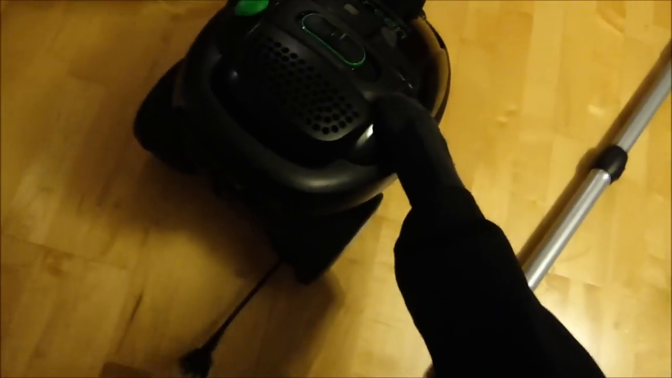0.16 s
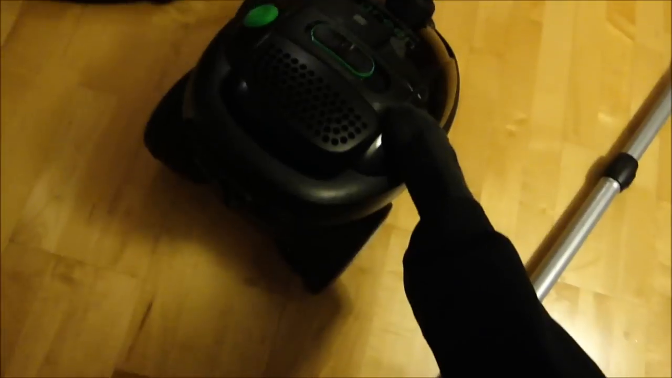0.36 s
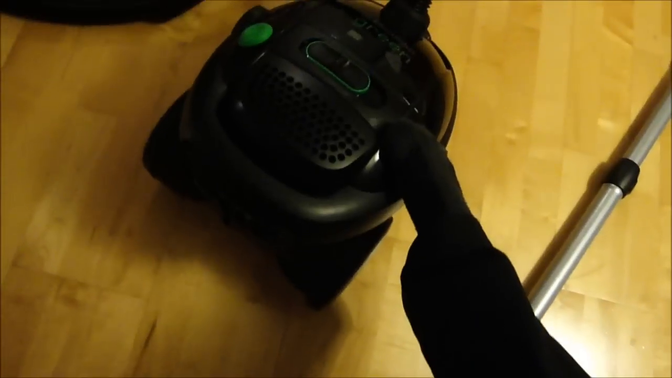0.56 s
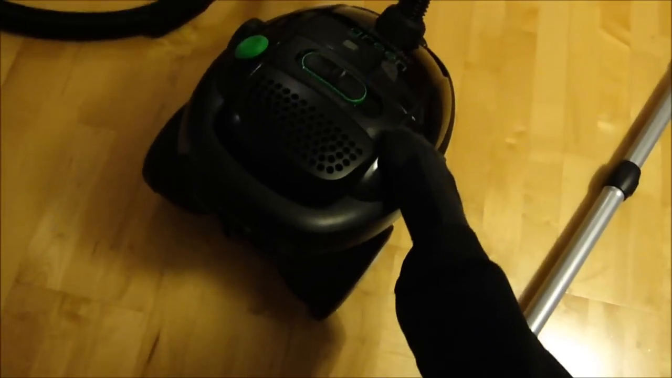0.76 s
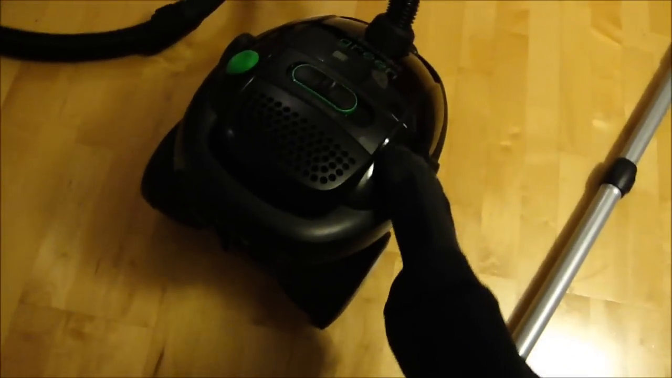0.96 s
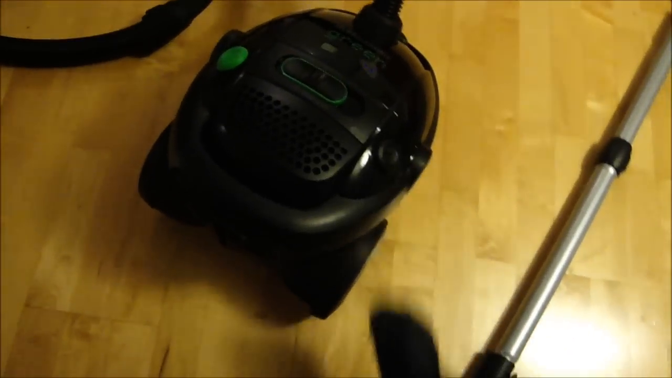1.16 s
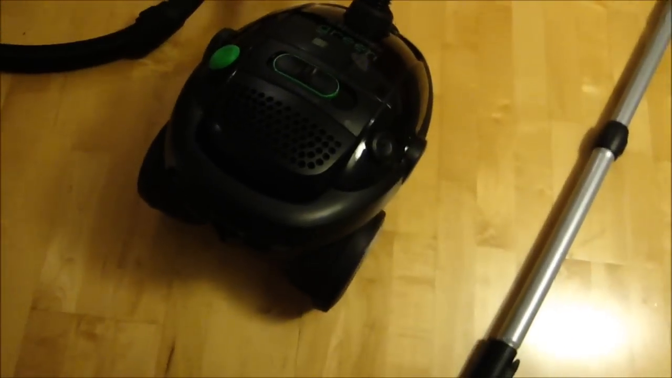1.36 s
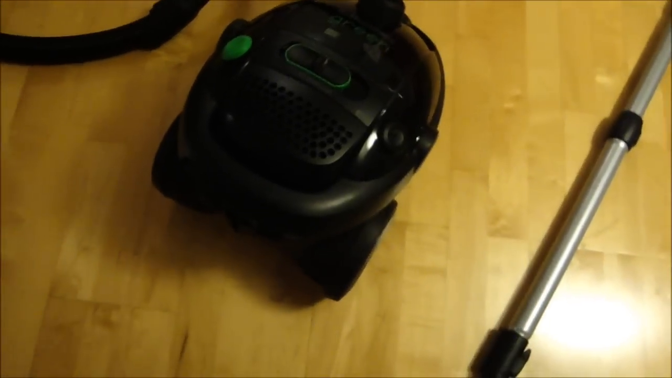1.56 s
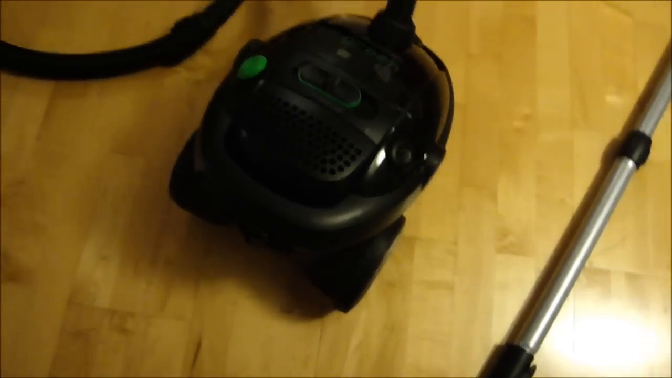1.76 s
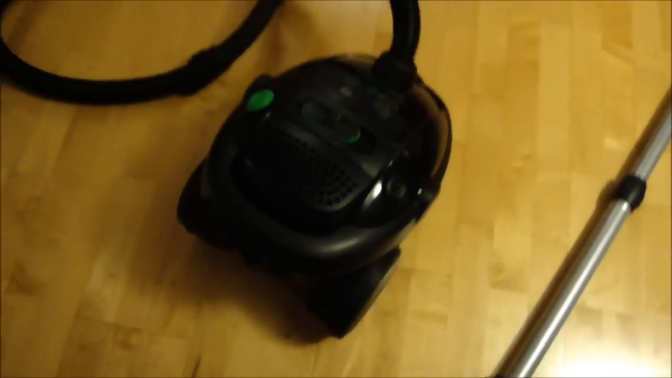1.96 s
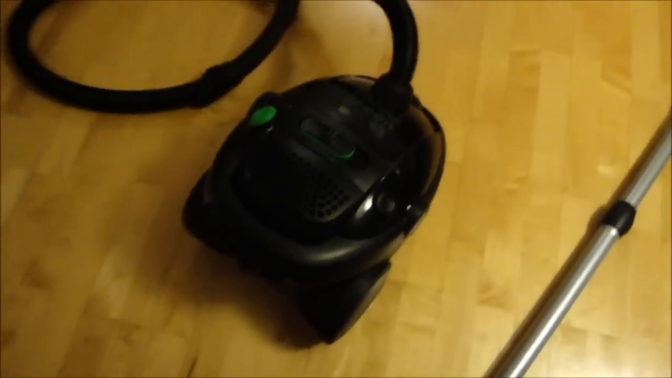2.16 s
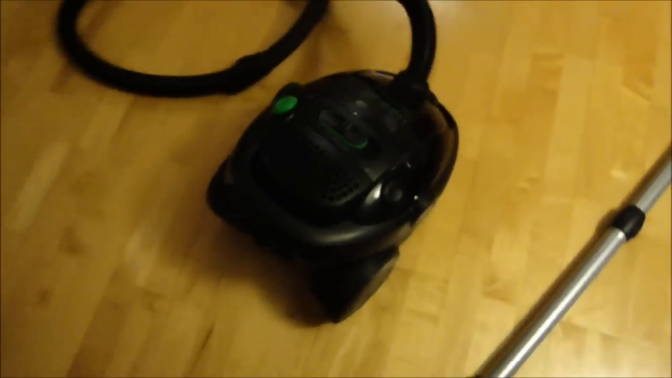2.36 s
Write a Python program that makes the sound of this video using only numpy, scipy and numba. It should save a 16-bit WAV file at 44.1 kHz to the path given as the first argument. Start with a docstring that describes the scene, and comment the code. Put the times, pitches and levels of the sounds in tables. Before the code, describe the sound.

Vacuum cord rewind ends in a loud plastic slam and rattle, then a quiet pedal release

```python
"""A vacuum cleaner's cord whirrs and briefly squeals onto its reel, then the plug slams into the plastic housing
and bounces: slips and blows ring damped housing modes, and a bare hard-floored room answers with filtered noise.
The foot leaves the pedal among thin dry ticks; a camera's focus motor ticks and the hand creaks on its body, all
as short damped modes. Shaped noise hisses beneath. A peak limiter turns down the loudest blows."""
import sys
import numpy as np
from scipy import signal
from scipy.fft import rfft, irfft
from scipy.io import wavfile
from scipy.ndimage import uniform_filter1d
from numba import njit

SR = 44100
rng = np.random.default_rng(int(sys.argv[2]) if len(sys.argv) > 2 else 0)


def field_ratio(decibels):
    """Amplitude ratio for a level in dB (20 dB per decade); scalars and array-likes work."""
    return 10 ** (np.asarray(decibels, dtype=float) / 20)


def generate_wav(signal):
    """Clip the signal to [-1, 1] and save it as 16-bit WAV at the path in sys.argv[1]."""
    frames = np.transpose(np.atleast_2d(signal))
    scaled = np.clip(frames, -1, 1) * 32767
    pcm = np.round(scaled).astype(np.int16)
    wavfile.write(sys.argv[1], SR, pcm)


N = 110250  # samples
GRAIN = 4096  # samples in one ring or crack
CRACK_T60_S = 0.0098

# plastic housing modes: pitch_hz, level_db, t60_s
HOUSING_MODES = [(340, -11, 0.022), (555, -19, 0.067), (646, 9, 0.019), (806, 1.5, 0.024), (993, 1, 0.029),
                 (1116, 6.5, 0.02), (1522, 4.5, 0.019), (1910, 5.5, 0.01), (1990, -9, 0.0065),
                 (2770, 4.5, 0.0041), (3150, -12.5, .01), (4100, -12, 0.0058), (4770, -11, 0.02),
                 (6000, -33, 0.0027)]


def unit(x):
    """Scale to an rms of 1."""
    return x / np.sqrt(np.mean(x ** 2))


def band(x, hz, width_hz):
    """Band-pass around hz."""
    edges_hz = [max(hz - width_hz / 2, 10), min(hz + width_hz / 2, 20000)]
    return signal.sosfilt(signal.butter(1, edges_hz, "band", fs=SR, output="sos"), x)


def cut_bass(x, hz):
    """High-pass: small bodies radiate little bass."""
    return signal.sosfilt(signal.butter(2, hz, "high", fs=SR, output="sos"), x)


def add(out, start_s, x):
    """Mix x into out from start_s."""
    i = int(start_s * SR)
    out[i:i + len(x)] += x[:N - i]


def fade(t60_s, size=GRAIN):
    """Exponential decay, 60 dB in t60_s."""
    return np.exp(-np.log(1000) * np.arange(size) / SR / t60_s)


def ring(hz, t60_s):
    """One damped mode."""
    return np.sin(2 * np.pi * hz * np.arange(GRAIN) / SR) * fade(t60_s)


def crack(t60_s):
    """Sharp spike trailed by a short noise burst, dull at both edges of the spectrum."""
    burst = rng.standard_normal(GRAIN) * fade(t60_s)
    burst[0] = 2.26
    burst = uniform_filter1d(burst, size=3, origin=1)
    return signal.sosfilt(signal.butter(1, [900, 3240], "band", fs=SR, output="sos"), burst) * 2


def patchy():
    """Quick random wandering of level."""
    spread_db, window = 2.5, int(0.012 * SR)
    drift = uniform_filter1d(uniform_filter1d(rng.standard_normal(N), window), window)
    return field_ratio(spread_db * unit(drift))


def rub(curve, rasp_db):
    """Dense uneven slips ring the housing, damped by the contact, with a fine rasp on top."""
    slips_per_s, scatter_db, t60_factor = 1800, 3, 0.6
    t = np.arange(N) / SR
    time_s, level_db, brightness = np.array(curve).T
    hits = rng.random(N) < slips_per_s / SR
    sizes = field_ratio(scatter_db * rng.standard_normal(N))
    slips = unit(hits * sizes * rng.choice([-1, 1], N))
    tilt_db_per_oct = np.clip(np.interp(t, time_s, brightness), -6, 5)
    body, power = 0, 0
    for hz, mode_db, t60_s in HOUSING_MODES:
        gain = field_ratio(mode_db + tilt_db_per_oct * np.log2(hz / 1000))
        mode = ring(hz, t60_factor * t60_s)
        body = body + gain * patchy() * signal.fftconvolve(slips, mode)[:N]
        power = power + gain ** 2 * np.sum(mode ** 2)
    rasp = unit(band(slips + rng.standard_normal(N), 4600, 7600))
    on = (t >= time_s[0]) & (t < time_s[-1])
    return (body / np.sqrt(power) + field_ratio(rasp_db) * rasp) * field_ratio(np.interp(t, time_s, level_db)) * on


def squeal():
    """The cord catches: noise in a narrow band wavers as a tone that swells and fades."""
    # start_s, end_s, pitch_hz, width_hz, level_db
    squeals = [(.016, .036, 1850, 300, -43), (.052, .09, 1090, 130, -39)]
    out = np.zeros(N)
    for start_s, end_s, hz, width_hz, db in squeals:
        size = int((end_s - start_s) * SR)
        noise = rng.standard_normal(4 * size)
        tone = band(band(noise, hz, width_hz), hz, width_hz)[-size:]  # filters settled
        swell = np.sin(np.pi * np.linspace(0, 1, size) ** 0.86) ** 0.5
        add(out, start_s, field_ratio(db) * unit(tone) * swell)
    return out


def strike(blows, spread_oct, push_s):
    """Each blow rings the housing modes near its pitch and cracks briefly; a softer contact pushes longer."""
    out = np.zeros(N)
    rise = 1 - np.exp(-np.arange(GRAIN) / SR / push_s)
    for start_s, db, centre_hz, crack_db in blows:
        detune = 1 + 0.02 * rng.standard_normal(len(HOUSING_MODES))
        tone = 0
        for (hz, mode_db, t60_s), shift in zip(HOUSING_MODES, detune):
            nearness = np.exp(-0.5 * (np.log2(hz / centre_hz) / spread_oct) ** 2)
            tone = tone + field_ratio(mode_db) * nearness * ring(hz * shift, t60_s)
        tone = rise * tone
        blow = tone / np.abs(tone).max() + field_ratio(crack_db) * crack(CRACK_T60_S)
        add(out, start_s, field_ratio(db) * blow)
    return out


def cord_reel():
    """Cord runs through its guide, plug strikes the housing, reel and plug rattle on inside."""
    # cord in the guide: time_s, level_db, brightness_db_per_oct (rub clamps it)
    cord = [(0, -42.5, 8.5), (.02, -39.5, 13), (.05, -37, 20), (.075, -38, 11), (.088, -31, 11),
            (.095, -49, 5), (.105, -35.5, -3), (.13, -43.5, 2), (.16, -37.5, 10), (.18, -29.5, 15),
            (.19, -43, -38), (.206, -34, 10), (.209, -57, 5)]
    # rattle after the slam: time_s, level_db, brightness_db_per_oct (rub clamps it)
    rattle = [(.212, -38, 0), (.24, -25, 1), (.27, -23.5, -4.5), (.3, -22.5, -9), (.33, -23, -2.5),
              (.345, -29.5, -19), (.375, -29.5, -5), (.4, -22.5, -8), (.43, -30.5, -3), (.46, -55, 4)]
    # blows on the housing: start_s, ring_peak_db, most_rung_hz, crack_db (relative to the ring)
    blows = [(.101, -31, 5200, -10), (.105, -24, 700, -14), (.146, -20, 1200, -12), (.149, -20, 1900, -10),
             (.177, -26, 1300, -14), (.2084, 11, 620, -20), (.218, -12, 800, -8), (.322, -12, 1000, -8),
             (.3346, 5, 1150, -18), (.3368, 3, 1150, -16), (.339, -3, 1500, -14), (.342, -3, 800, -18),
             (.3527, -1, 1900, -9), (.355, 1, 1300, -9), (.3575, -1, 900, -14), (.3635, -14, 1500, -10)]
    friction = rub(cord, rasp_db=-12) + rub(rattle, rasp_db=-26) + squeal()
    return cut_bass(friction + strike(blows, spread_oct=0.63, push_s=0.0002), 467)


def pedal_release():
    """Pedal springs back with soft knocks while it slides under the sock."""
    # slide under the sock: time_s, level_db, brightness_db_per_oct (rub clamps it)
    slide = [(.92, -84, -4), (.95, -47, -13), (.975, -46.5, -9), (.99, -42.5, 16), (1.015, -41.5, -14.5),
             (1.045, -52, 2), (1.09, -57.5, 2), (1.12, -70, -9)]
    # pedal knocks: start_s, ring_peak_db, most_rung_hz, crack_db (relative to the ring)
    knocks = [(.977, -33, 640, -26), (.9875, -31, 650, -26), (.9915, -24, 650, -22),
              (1.0015, -32, 650, -26), (1.013, -35, 650, -26), (1.0345, -36, 700, -6),
              (1.038, -36, 700, -6)]
    return cut_bass(rub(slide, rasp_db=-6.5) + strike(knocks, spread_oct=0.266, push_s=0.0018), 300)


def hand_creak():
    """The hand shifts on the camera: single body modes, each with a faint crack."""
    # creaks: start_s, level_db, pitch_hz, t60_s
    creaks = [(2.4115, -26.5, 1020, 0.045), (2.4132, -26, 360, 0.046), (2.416, -22.5, 1330, 0.007),
              (2.418, -26.5, 557, .025), (2.417, -36, 5760, 0.0092), (2.4196, -27, 3000, 0.0042),
              (2.42, -26.5, 1950, 0.0041), (2.423, -25, 1090, 0.022), (2.425, -26.5, 560, 0.02),
              (2.431, -30.5, 363, 0.052)]
    out = np.zeros(N)
    for start_s, db, hz, t60_s in creaks:
        add(out, start_s, field_ratio(db) * (ring(hz, t60_s) + field_ratio(-8.5) * crack(2 * CRACK_T60_S)))
    return out


def thin_ticks():
    """Thin dry ticks, some from the pedal's release: two high, quickly damped modes each."""
    # ticks: start_s, level_db, pitch_hz
    ticks = [(0.88, -36.5, 7300), (1.006, -40, 7200), (1.035, -33.5, 7300), (1.034, -39, 4360),
             (1.04, -36, 6000), (1.99, -50, 6000), (2.078, -38, 6800), (2.189, -36.5, 6200),
             (2.485, -48, 5000)]
    out = np.zeros(N)
    for start_s, db, hz in ticks:
        add(out, start_s, field_ratio(db) * (ring(hz, 0.0031) + ring(1.16 * hz, 0.0024)))
    return out


def focus_motor():
    """Evenly timed motor steps, each ringing one high mode of slightly varying pitch and level."""
    # runs: first_step_s, end_s, level_db
    runs = [(0.602, .69, -49), (0.709, .81, -45), (1.0706, 1.095, -44), (1.1041, 1.21, -41.5),
            (1.672, 1.7, -46)]
    steps_per_s, pitch_hz, spread_hz, scatter_db = 59.94, 6160, 310, 2
    out = np.zeros(N)
    for first_s, end_s, db in runs:
        for start_s in np.arange(first_s, end_s, 1 / steps_per_s):
            level = field_ratio(db + scatter_db * rng.standard_normal())
            hz = pitch_hz + spread_hz * (rng.random() - 0.5)
            add(out, start_s, level * ring(hz, 0.0062))
    return out


def room(x):
    """Diffuse echoes that gather after a short gap and die first in the treble."""
    # response: pitch_hz, level_db, t60_s
    response = np.array([(200, -13.5, 0.65), (427, -6.5, 0.42), (704, -1, 0.41), (1450, -2.5, 0.45),
                         (3000, 3, 0.35), (6000, -5, 0.34), (9500, 1, 0.15)])
    gap_s, rise_s = 0.0022, 0.025
    t, tail = np.arange(SR) / SR, 0
    log_hz = np.log(response[:, 0])
    for hz in 80 * 2 ** np.arange(0, 7.6, 0.5):
        db = np.interp(np.log(hz), log_hz, response[:, 1])
        t60_s = np.interp(np.log(hz), log_hz, response[:, 2])
        tail = tail + field_ratio(db) * band(rng.standard_normal(SR), hz, hz / 3) * fade(t60_s, size=SR)
    tail = tail * (1 - np.exp(-np.maximum(t - gap_s, 0) / rise_s))
    return signal.fftconvolve(x, tail / np.sqrt(np.sum(tail ** 2)))[:N]


def hiss():
    """Microphone hiss and room hush: steady noise with a shaped spectrum."""
    # spectrum shape: pitch_hz, density_db (relative, per Hz)
    shape = np.array([(15, -79), (25, -35), (134, -6), (391, -0.5), (444, -1), (668, -1), (740, -2),
                      (954, -3.5), (1170, -5), (9440, -17), (11000, -24.5), (14300, -91), (22000, -120)])
    hz = np.clip(np.fft.rfftfreq(N, 1 / SR), 1, 9800)  # shape held flat above 9800 Hz
    gain = field_ratio(np.interp(np.log(hz), np.log(shape[:, 0]), shape[:, 1]))
    return unit(irfft(rfft(rng.standard_normal(N)) * gain, N)) * field_ratio(-49.5)


def scene():
    """Reel and pedal sound in the room; camera sounds and thin ticks, some the pedal's, stay without echo."""
    reel, pedal = cord_reel(), pedal_release()
    echoes = room(field_ratio(-6.5) * reel + field_ratio(-16.5) * pedal)
    echoless = cut_bass(hand_creak() + thin_ticks() + focus_motor(), 174)
    return (reel + pedal + echoes + echoless + hiss())[None]


@njit
def limit(x, top, release):
    """Gain drops at once above the ceiling and recovers gradually."""
    y, envelope = np.empty(len(x)), 0.
    for i in range(len(x)):
        envelope = max(abs(x[i]), envelope * release)
        y[i] = x[i] * min(1., top / (envelope + 1e-9))
    return y


def band_limit(x):
    """A steep low-pass at the top of the band."""
    return signal.sosfilt(signal.butter(12, 11950, fs=SR, output="sos"), x)


def record(dry):
    """Peak limiter, steep treble cut, clipping."""
    ceiling_db, release_s, top_hz = -0.5, 0.023, 10950
    x = limit(dry[0], field_ratio(ceiling_db), np.exp(-1 / (release_s * SR)))
    x = signal.sosfilt(signal.ellip(10, 0.2, 75, top_hz, fs=SR, output="sos"), x)
    mix = np.clip(x, -1, 1)[None]
    return band_limit(mix)


dry = scene()
out = record(dry)
generate_wav(out)
```